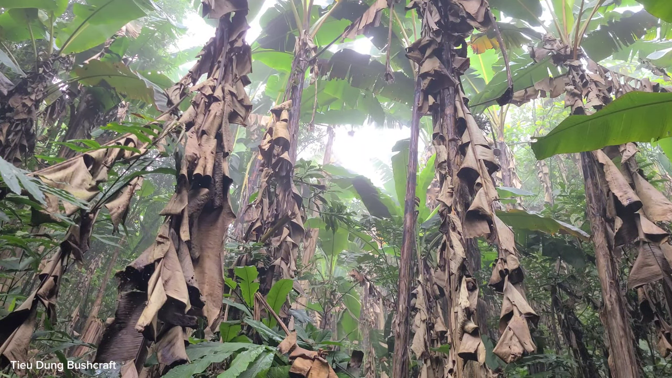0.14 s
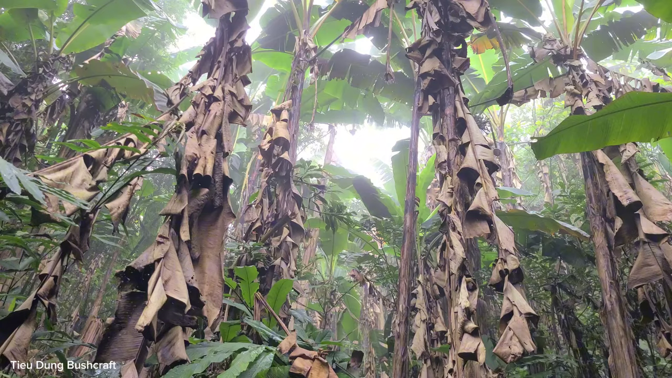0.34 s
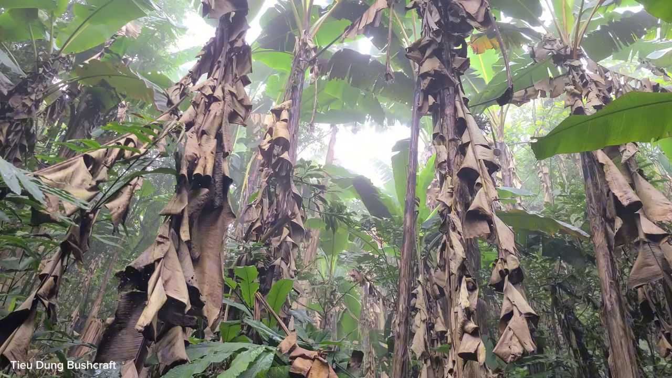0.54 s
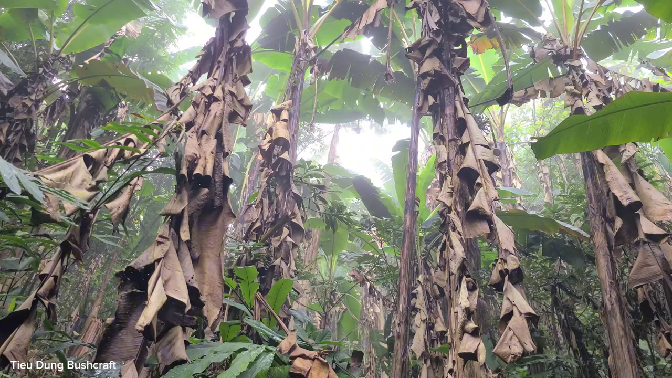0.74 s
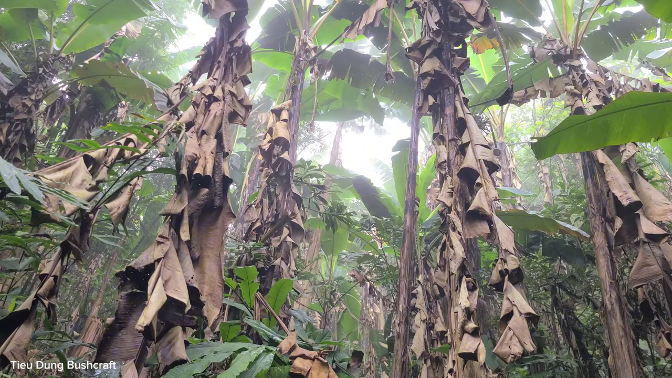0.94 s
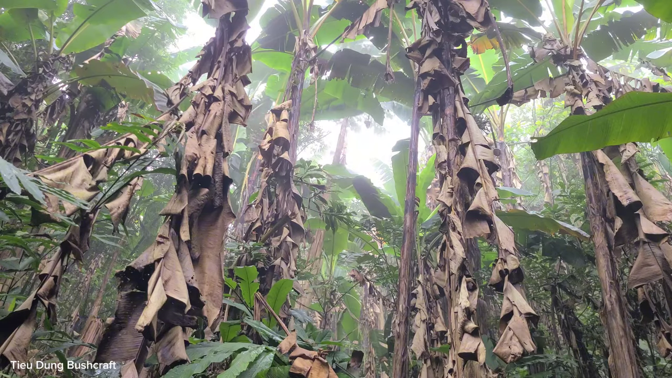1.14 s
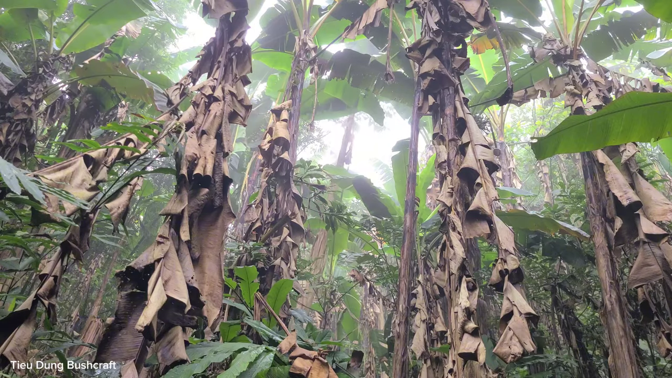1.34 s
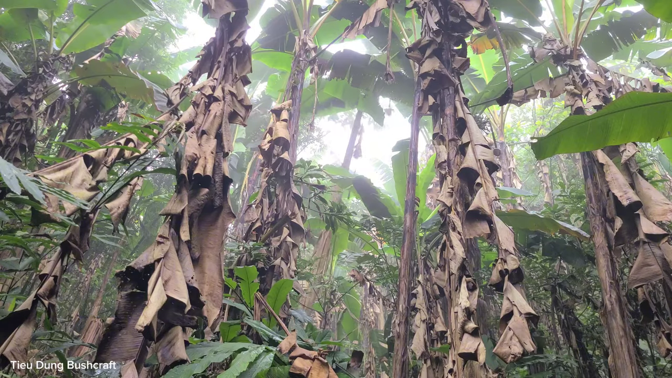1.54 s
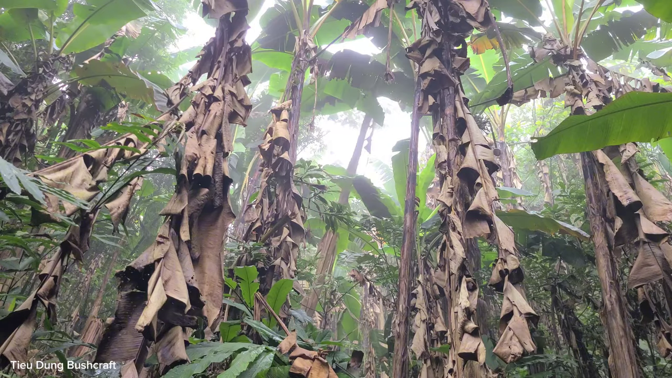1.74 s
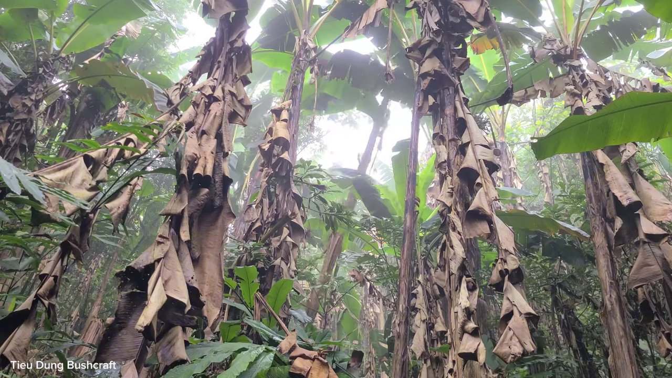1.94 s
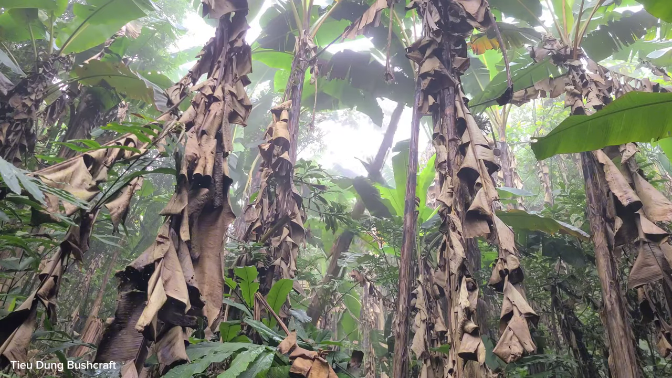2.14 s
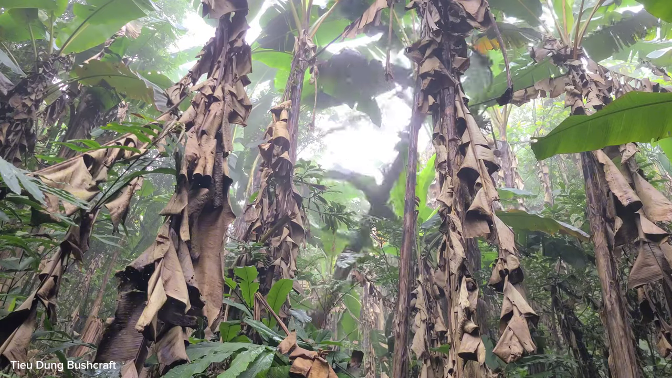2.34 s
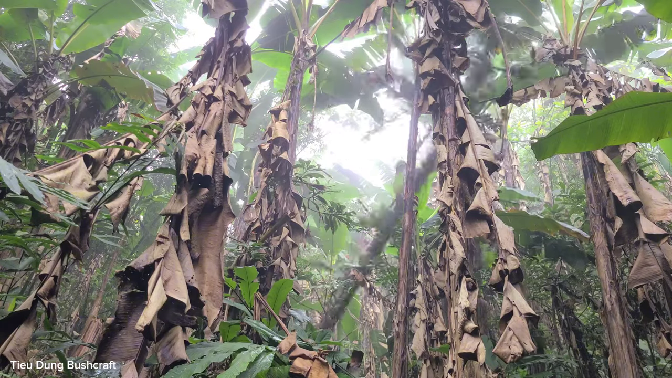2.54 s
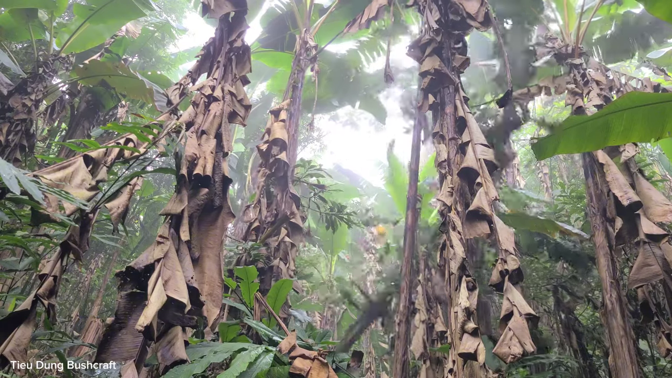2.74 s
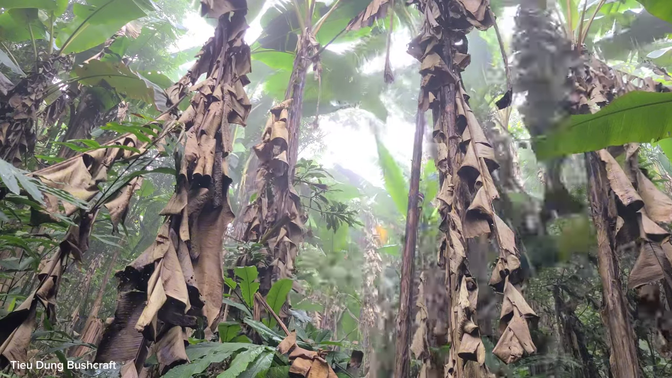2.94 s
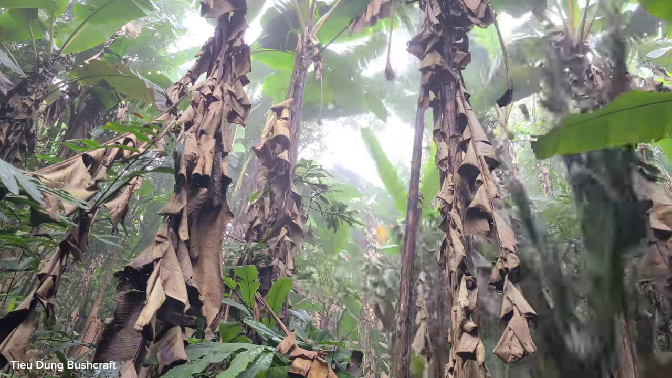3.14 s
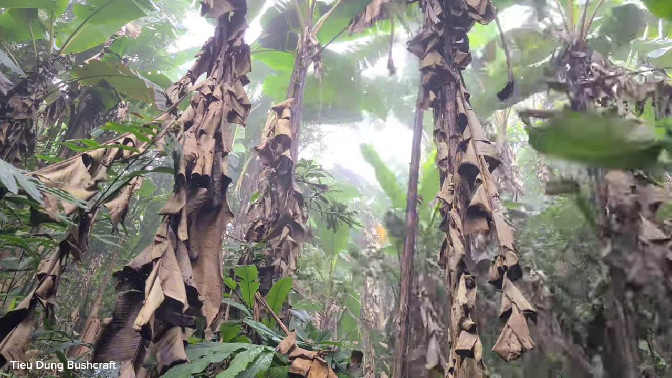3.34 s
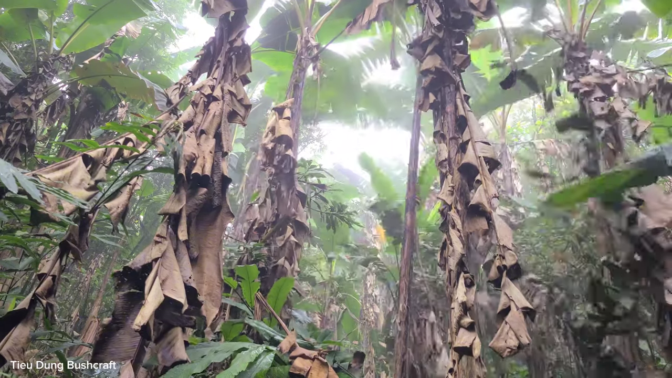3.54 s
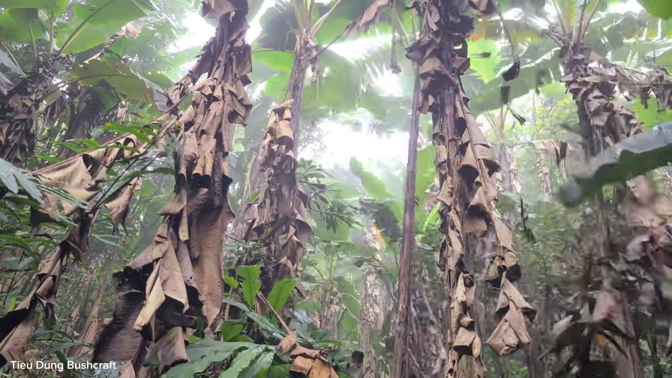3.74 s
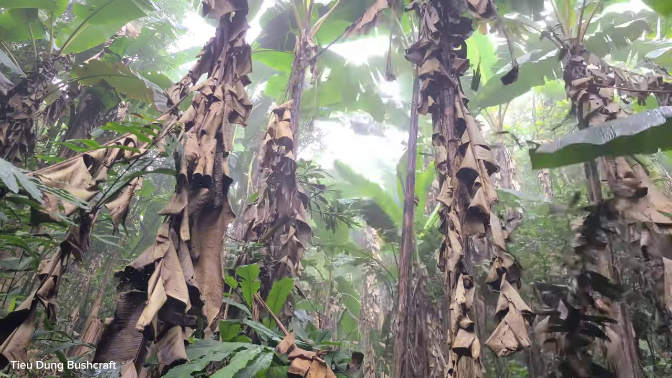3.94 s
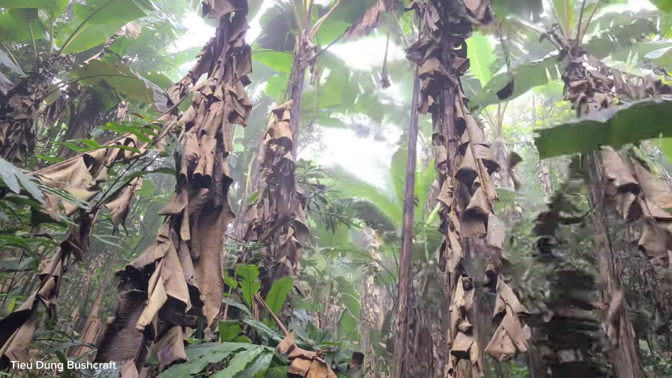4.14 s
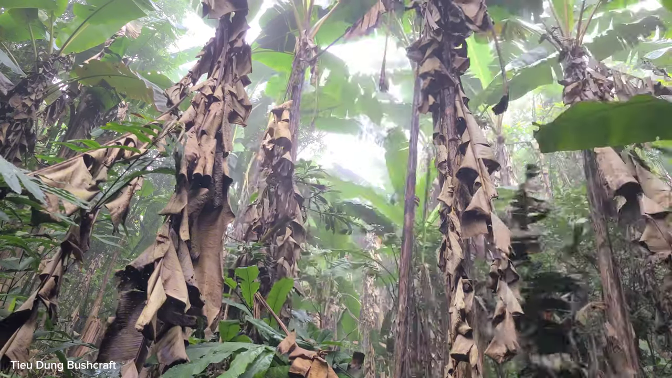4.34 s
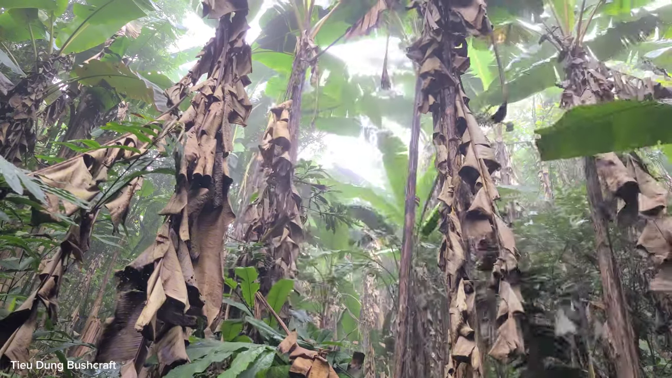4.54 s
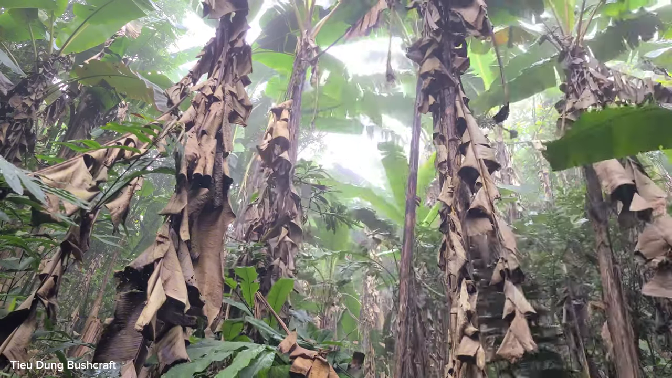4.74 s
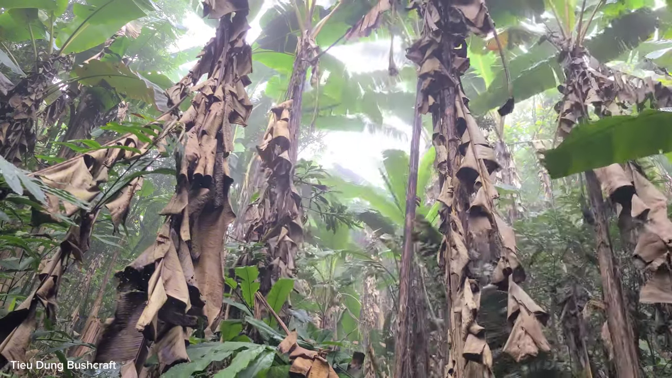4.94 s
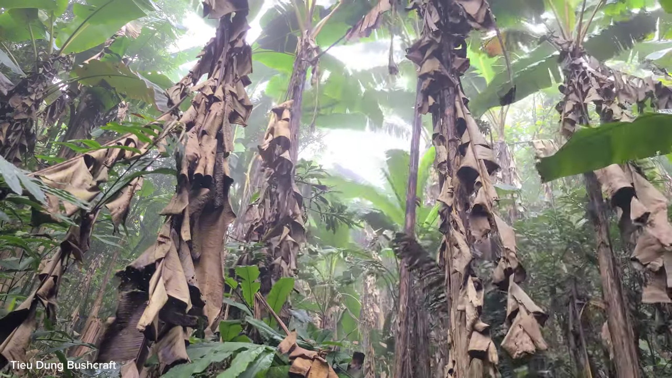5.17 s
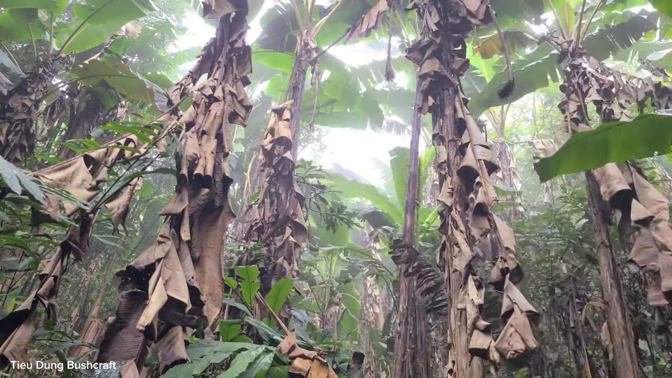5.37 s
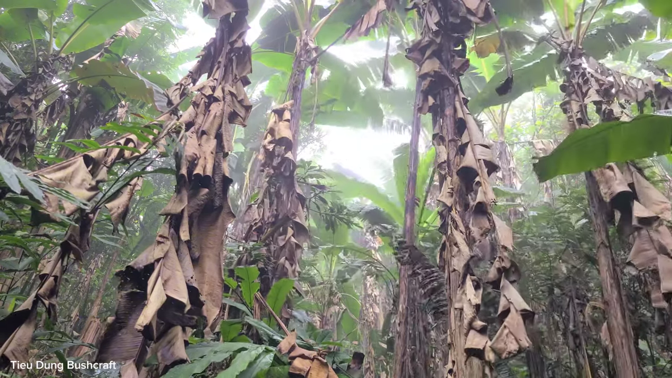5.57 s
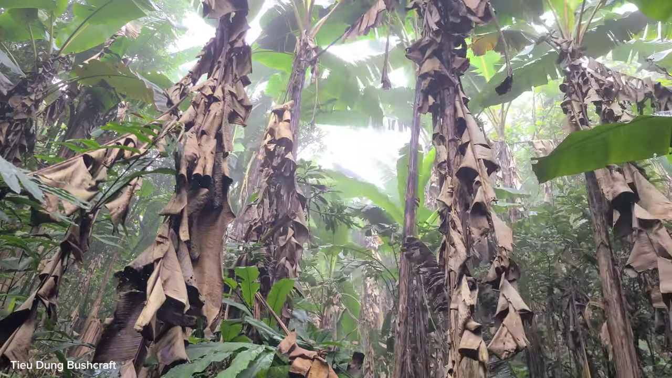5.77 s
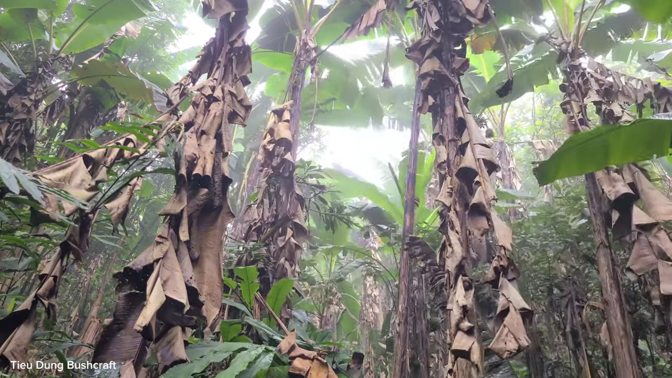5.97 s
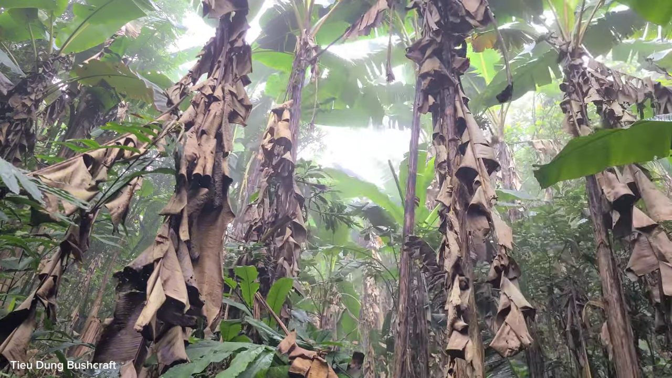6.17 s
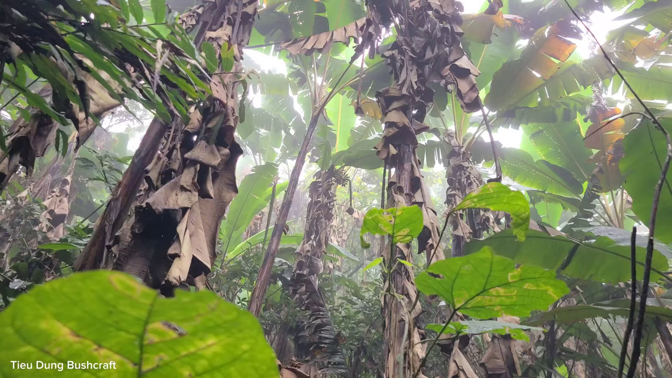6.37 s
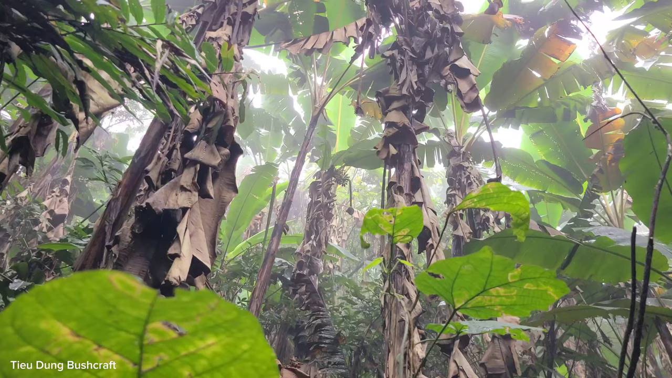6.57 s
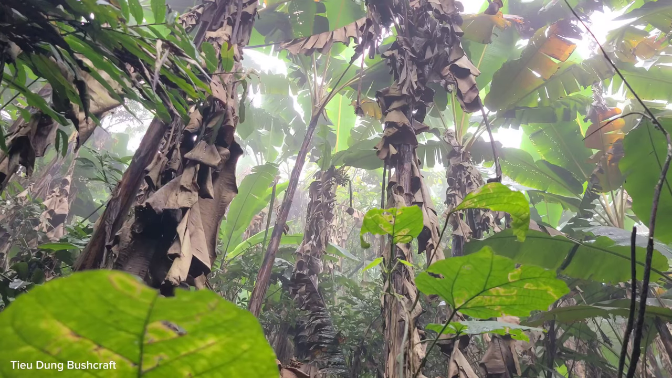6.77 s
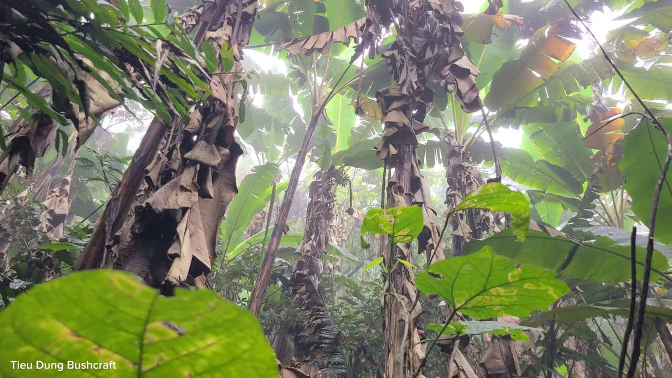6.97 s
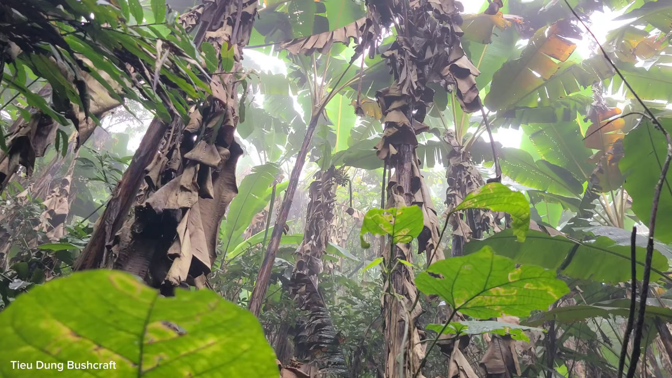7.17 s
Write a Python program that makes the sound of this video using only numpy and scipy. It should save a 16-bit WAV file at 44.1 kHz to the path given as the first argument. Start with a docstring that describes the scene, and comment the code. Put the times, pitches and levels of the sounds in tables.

```python
"""Tree falling through a dry grove

Its trunk groans (slip pulses ring modes), limbs crack (torn bursts ring modes), wood thumps (low sine pulses).
Twigs snap (resonant noise bursts). The crown moves from slightly right to further right.
Leaves (crackle plus noise), boughs (slaps plus noise) and air (low noise) swell with the sweep.
Fine litter sifts afterwards as narrow hiss. Two spaced microphones.
A short diffuse tail answers the cracks, twigs and groan."""
import sys
import numpy as np
from scipy import signal
from scipy.fft import rfft, irfft, next_fast_len
from scipy.io import wavfile
from scipy.ndimage import uniform_filter1d, map_coordinates

SR = 44100
rng = np.random.default_rng(int(sys.argv[2]) if len(sys.argv) > 2 else 0)


def generate_wav(signal):
    """Clip the signal to [-1, 1] and save it as 16-bit WAV at the path in sys.argv[1]."""
    frames = np.transpose(np.atleast_2d(signal))
    scaled = np.clip(frames, -1, 1) * 32767
    pcm = np.round(scaled).astype(np.int16)
    wavfile.write(sys.argv[1], SR, pcm)


N = 317891

# limb cracks: [t/s, level/dB, tear length to 1/e /s]
LIMB_CRACKS = [(0.5774, -19, 0.0072), (.59, -25.5, .02), (.83, -33.5, 0.026), (0.967, -31.5, 0.014),
               (1.055, -31.5, 0.011), (1.465, -39, 0.031), (2.097, -14, 0.034), (2.15, -10.5, 0.0028),
               (2.228, -9.5, 0.073), (2.3429, -5, 0.017), (2.376, -2, 0.01), (2.729, -6.5, 0.011),
               (2.997, -7, 0.011), (3.04, -9, 0.072), (3.185, -6, 0.014), (3.2, -6.5, 0.016),
               (3.245, -5, .025), (3.295, -6, 0.02), (4.507, -26, 0.0093), (4.639, -28, 0.0028),
               (4.77, -30, 0.011), (5.085, -28.5, 0.0039), (5.543, -28, 0.0061), (6.446, -34.5, 0.0072),
               (6.651, -38.5, 0.0026)]
# heavy wood thumps: [t/s, level before THUMP_TRIM_DB /dB, f/Hz]
WOOD_THUMPS = [(.584, -26.5, 94.5), (.593, -23, 177), (.6, -29, 60.4), (1.167, -29.5, 188), (1.24, -39, 62),
               (1.696, -26, 196), (2.245, -18.5, 65), (3.093, -7, 50), (3.176, 2, 198), (3.222, -2, 96),
               (3.25, -14, 55), (3.273, -5, 136), (3.359, -2.5, 171), (6.38, -44, 60), (6.42, -49, 60)]
# twig snaps: [t/s, level before TWIG_TRIM_DB and panning /dB, f/Hz, left lag/ms]
TWIG_SNAPS = [(.1068, -31.5, 1470, 0), (.334, -34.5, 9100, 0.042), (.506, -25.5, 1960, 0.45),
              (.542, -37, 6540, .3), (.741, -30.5, 2230, 0.5), (2.102, -19, 2500, .08),
              (4.329, -23, 3400, .4), (4.535, -19, 3800, .49), (4.538, -16, 9000, 0.47),
              (4.542, -17.5, 5000, 0.41), (4.6391, -22, 2220, 0.42), (4.996, -24.5, 3930, .2),
              (5.082, -31, 4500, 0.37), (5.9885, -34, 6000, 0.32), (6.346, -29.5, 1600, 0.15),
              (6.732, -40.5, 4000, 0.0077), (6.772, -36.5, 1400, 0.083), (7.166, -40.5, 2200, 0.014)]
# resonances of the straining trunk: [f/Hz, width/Hz, relative level/dB]
TRUNK_MODES = [(208, 85, 1), (485, 60, 0), (695, 55, 1.5), (930, 120, -11)]
# resonances of cracking limbs, before sap damping: [f/Hz, width/Hz, relative level/dB]
LIMB_MODES = [(245, 110, -5), (495, 90, 0), (680, 120, -2), (970, 160, -1.5), (1290, 260, -4.5),
              (1700, 400, -10)]
# colour of twig snaps as the microphones hear them: [f/Hz, relative level/dB]
HEARD_SNAP_SPECTRUM = [(40, -45), (150, 4), (600, 12.5), (2000, 5.5), (6800, 2.5), (8200, -7),
                       (12000, -1.5), (16000, -3)]
# colour of leaves as the microphones hear them, before the treble gain: [f/Hz, relative level/dB]
HEARD_LEAF_SPECTRUM = [(80, -70), (500, -9), (1200, 1), (1800, 0.5), (2500, -2.5), (3600, 0.5),
                       (5500, -1.5), (7100, -4), (7900, -13), (10000, -12), (11800, -9), (16000, -15.5)]
# colour of boughs: [f/Hz, relative level/dB]
BOUGH_SPECTRUM = [(50, -61), (120, -41), (220, -1.5), (320, -1.5), (520, 2), (720, -0.5), (1150, -2.5),
                  (1700, -9.5), (2600, -11), (6000, -24)]
# colour of pushed air, before the deep cut: [f/Hz, relative level/dB]
AIR_SPECTRUM = [(15, -35), (35, -12), (65, -5), (110, -6), (180, 1.5), (250, -13), (400, -13), (900, -27.5)]
# crown sweeping the foliage: [t/s, base rustle level/dB]
CROWN_SWEEP = [(0, -55.5), (1, -54), (1.6, -45.5), (1.92, -35.5), (2.08, -34.5), (2.29, -26.5),
               (2.7, -26.5), (3.05, -24.5), (3.28, -20.5), (3.39, -26), (3.52, -36.5), (3.9, -40.5),
               (4.15, -43.5), (4.6, -43), (5.28, -53), (5.9, -55.5), (6.4, -56), (6.65, -59)]
# shaking fronds: [t/s, rustle rise/dB, half length to 1/e /s]
FROND_FLUTTERS = [(0.627, 5, .045), (1.163, 3, 0.064), (2.15, 2.5, 0.032), (2.241, 1.5, 0.029),
                  (2.757, 4, 0.052), (3.734, 5, 0.0064), (3.957, 6, 0.025), (4.772, 4.5, 0.013),
                  (5.36, 6.5, 0.022), (5.566, 1, 0.085), (5.79, 4.5, 0.05), (6.065, 5.5, 0.01),
                  (6.443, 5, 0.052), (6.766, 4, .05), (7.044, 5.5, 0.023)]
# gain of the leaves above 7 kHz: [t/s, level/dB]
LEAF_TREBLE = [(0, -11.5), (1.3, 7.5), (2.3, -1), (2.7, 4.5), (3.9, 4), (5.2, 1), (6.44, 0.5), (6.5, -23),
               (7.2, -13)]
# decay of the grove's tail: [f/Hz, t60/s]
GROVE_DECAY = [(60, 0.25), (200, 0.81), (600, 0.51), (3000, 0.086), (12000, 0.27)]

SPACING_S = 0.00041  # sound's travel time between the microphones
TOP_HZ = 16000
TIP_S, LAND_S, FALL_POWER = 1.54, 3.34, 3.1
UPRIGHT_LAG_MS, FALLEN_LAG_MS = 0.14, 0.26  # left microphone's lag, crown up and down
THUMP_TRIM_DB, TWIG_TRIM_DB = -7.5, 4.5
THUD_DB, THUD_HZ = -4.5, 219  # thud with each crack: dB over crack level, before THUMP_TRIM_DB
TWIG_REACH = 5.8  # treble corner of a snap, in multiples of its pitch
LEAVES_DB = 3.5  # over the sweep
LEAVES_RIGHT_DB, FALLEN_RIGHT_DB = 2.5, 1.5  # right over left; extra once fallen
BOUGHS_DB, BOUGHS_DB_PER_DB = 1.05, 0.94  # trim; gain per dB of sweep
AIR_DB, AIR_DB_PER_DB, AIR_ALOFT_DB = -3, 1.33, -11  # trim; gain per dB of sweep; extra while upright
PIVOT_DB = -40  # sweep level that driven() leaves unchanged


def cracks():
    """Torn fibres stick and slip in a quick run that rings the limb."""
    out, t = np.zeros(N), np.arange(SR // 8) / SR
    # sappy wood swallows the treble
    damp = lambda hz: 1 / (1 + 1j * hz / 1300 - (hz / 1900) ** 2)
    for s, db, length_s in LIMB_CRACKS:
        gaps_s = np.exp(0.25 * rng.standard_normal(size=50)) / 500
        slip_s = np.cumsum(gaps_s)
        slip_samples = ((slip_s - slip_s[0]) * SR).astype(int)
        slips = np.bincount(slip_samples, minlength=len(t))[:len(t)]
        grit = 0.8 * rng.standard_normal(len(t))
        tear = (unit(slips) + grit) * np.exp(-(t / length_s) ** 2)
        sound = filtered(tear, lambda hz: ringing(LIMB_MODES, hz) * damp(hz))
        add(out, s, amp(db) * sound / np.abs(sound).max())
    return from_crown(out)


def thumps():
    """Heavy wood meets soft ground or gives way in a crack: a low push of a few cycles."""
    out, t = np.zeros(N), np.arange(SR // 5) / SR
    thuds = [(s, db + THUD_DB, THUD_HZ) for s, db, _ in LIMB_CRACKS]
    for s, db, hz in list(WOOD_THUMPS) + thuds:
        cycles = t * hz
        envelope = cycles / 0.5 * np.exp(1 - cycles / 0.53)
        push = envelope * np.sin(2 * np.pi * cycles)
        add(out, s, amp(db + THUMP_TRIM_DB) * push)
    return from_crown(out)


def groan():
    """Fibres slip at an uneven rate and ring the trunk: faintly under strain, strongly as it gives way."""
    slips = ticks(400, spread_db=0.0)
    sound = unit(filtered(slips, lambda hz: ringing(TRUNK_MODES, hz)))
    strained_db = swell(peak_db=-59.5, start_s=0.77, end_s=2, rise_db_per_s=5, fall_db_per_s=44)
    yielding_db = swell(peak_db=-38.0, start_s=1.87, end_s=2.63, rise_db_per_s=30, fall_db_per_s=40)
    return from_crown(sound * (amp(strained_db) + amp(yielding_db)))


def twigs():
    """Dry twigs snap: noise bursts with one broad resonance, dulled by the foliage between."""
    out, t = np.zeros((2, N)), np.arange(SR // 20) / SR
    heard = lambda hz: amp(along(HEARD_SNAP_SPECTRUM, hz))
    for s, db, pitch_hz, lag_ms in TWIG_SNAPS:
        dull_hz = TWIG_REACH * pitch_hz
        burst = rng.standard_normal(len(t)) * np.exp(-(t / 0.0028) ** 2)
        scatter = amp(-15) * rng.standard_normal((2, len(t))) * amp(-60 * t / 0.04)
        stick = lambda hz: 0.35 + ringing([(pitch_hz, 0.45 * pitch_hz, 0)], hz)
        foliage = lambda hz: 1 / np.sqrt(1 + (hz / dull_hz) ** 4)
        late = lambda hz: np.exp(-2j * np.pi * hz * np.array([[lag_ms / 1000], [0]]))
        sound = filtered(burst + scatter, lambda hz: stick(hz) * foliage(hz) * heard(hz) * late(hz))
        add(out, s, amp(db + TWIG_TRIM_DB) * sound / np.abs(sound).max())
    return out * amp([[-1.5], [1.5]])


def leaves():
    """Dry blades crackle in clusters; the harder the sweep, the more the crackles merge into hiss."""
    level_db, = curves(CROWN_SWEEP)
    treble_db, = curves(LEAF_TREBLE)
    right_db = LEAVES_RIGHT_DB + FALLEN_RIGHT_DB * fallen()
    rate_hz = 450 * amp(0.7 * (level_db + 48.5))
    t = np.arange(SR // 100) / SR
    crackle = np.zeros((2, N))
    for _ in range(8):  # each clump has its own crinkle and moments
        crinkle = rng.standard_normal((2, len(t))) * amp(-60 * t / 0.0064)
        stirring = ticks(rate_hz / 8, spread_db=2.0) * amp(1.8 * wobble(7))
        crackle += signal.fftconvolve(stirring[None], crinkle, axes=1)[:, :N]
    mix = rush(patchy_db=1.5) + amp(-5.0) * unit(crackle)
    sound = unit(filtered(mix, lambda hz: amp(along(HEARD_LEAF_SPECTRUM, hz))))
    treble = filtered(sound, lambda hz: 1 / (1 + (7000 / (hz + 1)) ** 4))
    sound = sound + (amp(treble_db) - 1) * treble
    tremble_db = 0.6 * wobble(25)
    pan_db = np.array([-right_db, right_db]) / 2
    return sound * amp(level_db + flutter() + LEAVES_DB + tremble_db + pan_db)


def boughs():
    """Branches and broad leaves slap in the crown, over a diffuse swish from all around."""
    level_db = driven(BOUGHS_DB_PER_DB)
    slap_rate_hz = 600 * amp(0.35 * (level_db + 52))
    slaps = from_crown(ticks(slap_rate_hz, spread_db=5.0))
    mix = rush(patchy_db=2.0) + amp(0.5) * slaps
    sound = filtered(mix, lambda hz: amp(along(BOUGH_SPECTRUM, hz)))
    sway_db = 1.2 * wobble(22)
    return unit(sound) * amp(level_db + 0.67 * flutter() + BOUGHS_DB + sway_db)


def air():
    """Air pushed aside by the crown rushes low; a weak rush loses its deepest notes."""
    level_db = driven(AIR_DB_PER_DB) + AIR_DB + AIR_ALOFT_DB * (1 - fallen())
    sound = unit(filtered(rush(patchy_db=2.0), lambda hz: amp(along(AIR_SPECTRUM, hz))))
    deep = filtered(sound, lambda hz: 1 / (1 + (hz / 60) ** 6))
    deep_db = 1.4 * np.minimum(level_db + 47, 0)
    return (sound + (amp(deep_db) - 1) * deep) * amp(level_db)


def sifting():
    """Tiny grains of litter make a narrow hiss that lingers after the fall."""
    hiss = rush(patchy_db=2.5)
    grains = all_around(np.array([ticks(900, spread_db=0), ticks(900, spread_db=8)]))
    sound = unit(filtered(hiss + grains, lambda hz: ringing([(4200, 760, 0)], hz) ** 2))
    litter_db = swell(peak_db=-50.5, start_s=4.3, end_s=5.2, rise_db_per_s=31, fall_db_per_s=16)
    return sound * amp(litter_db + np.array([[-2.5], [2.5]]))


def grove(x):
    """Stems and foliage scatter a short diffuse tail, its decay set by frequency."""
    hz, t, z = signal.stft(rng.standard_normal((2, SR // 2)), SR, nperseg=256)
    decay = amp(-60 * t / along(GROVE_DECAY, hz)[:, None])
    tail = all_around(signal.istft(z * decay, SR, nperseg=256)[1])
    return signal.fftconvolve(x, tail / np.linalg.norm(tail[0]), axes=1)[:, :N]


def rush(patchy_db):
    """Diffuse noise with time-frequency patches of random gain."""
    z = signal.stft(rng.standard_normal((2, N)), nperseg=512)[2]
    field = uniform_filter1d(rng.standard_normal(z.shape[1:]), size=7, axis=0)
    field = uniform_filter1d(field, size=8, axis=1)
    noise = signal.istft(z * amp(patchy_db * unit(field)), nperseg=512)[1][:, :N]
    return unit(all_around(noise))


def ticks(rate_hz, spread_db):
    """Random impulses of uneven size; mean power independent of rate."""
    chance = np.clip(rate_hz / SR, 1e-5, 1)
    size = amp(spread_db * np.minimum(rng.standard_normal(N), 2.5))
    hits = rng.random(N) < chance
    return unit(hits * size * np.sign(rng.standard_normal(N)) / np.sqrt(chance))


def fallen():
    """Fall progress, slow then gathering speed: 0 upright, 1 on the ground."""
    progress = (np.arange(N) / SR - TIP_S) / (LAND_S - TIP_S)
    return np.clip(progress, 0, 1) ** FALL_POWER


def driven(db_per_db):
    """Level in dB that follows the sweep at this slope."""
    return PIVOT_DB + db_per_db * (curves(CROWN_SWEEP)[0] - PIVOT_DB)


def flutter():
    """Decibels by which shaking fronds lift the rustle."""
    t = np.arange(N) / SR
    return sum(db * np.exp(-((t - s) / half_s) ** 2) for s, db, half_s in FROND_FLUTTERS)


def swell(peak_db, start_s, end_s, rise_db_per_s, fall_db_per_s):
    """Level in dB that climbs to its peak, holds and dies away."""
    t = np.arange(N) / SR
    rise_db = rise_db_per_s * np.maximum(start_s - t, 0)
    fall_db = fall_db_per_s * np.maximum(t - end_s, 0)
    return peak_db - rise_db - fall_db


def from_crown(x):
    """Crown sound reaches the left microphone later, more so as the tree falls to the right."""
    lag_ms = UPRIGHT_LAG_MS + (FALLEN_LAG_MS - UPRIGHT_LAG_MS) * fallen()
    half_samples = lag_ms * SR / 1000 / 2
    return np.array([map_coordinates(x, [np.arange(N) + way * half_samples]) for way in (-1, 1)])


def all_around(pair):
    """Two unrelated signals become a diffuse field: alike in the bass, unrelated in the treble."""
    turn = lambda hz: np.arccos(np.sinc(2 * hz * SPACING_S)) / 2
    mid, side = filtered(pair, lambda hz: np.array([np.cos(turn(hz)), np.sin(turn(hz))]))
    return np.array([mid + side, mid - side])


def ringing(modes, hz):
    """Causal response of (Hz, width Hz, dB) resonances."""
    return sum(amp(db) * 1j * hz * w / (c * c - hz * hz + 1j * hz * w) for c, w, db in modes)


def filtered(x, response):
    """x times a complex response of frequency."""
    n = x.shape[-1]
    m = next_fast_len(n + SR // 4)
    return irfft(rfft(x, m) * response(np.fft.rfftfreq(m, 1 / SR)), m)[..., :n]


def wobble(rate_hz):
    """Smooth random curve with this many knots a second."""
    knots = rng.standard_normal(int(N * rate_hz / SR) + 4)
    return map_coordinates(knots, [np.arange(N) * rate_hz / SR])


def curves(rows):
    """One value per sample for each column after the time."""
    s, *cols = np.transpose(rows)
    return [np.interp(np.arange(N) / SR, s, c) for c in cols]


def along(points, hz):
    """(Hz, value) points interpolated on a log axis."""
    f, v = np.transpose(points)
    return np.interp(np.log(hz + 1), np.log(f + 1), v)


def add(track, s, sound):
    """Mix a sound into a track at time s."""
    part = track[..., max(round(s * SR), 0):][..., :sound.shape[-1]]
    part += sound[..., :part.shape[-1]]


def amp(db):
    """Decibels to gain."""
    return 10 ** (np.asarray(db) / 20)


def unit(x):
    """x at rms 1."""
    return x / np.sqrt(np.mean(x ** 2) + 1e-20)


def scene():
    """Cracks, twigs and groan with their grove tail, plus thumps, inside the rustle."""
    wood = cracks() + twigs() + groan()
    echo = amp(-5.5) * grove(wood)
    rustle = leaves() + boughs() + air() + sifting()
    return wood + echo + thumps() + rustle


def record(dry):
    """Microphones lose the lowest bass; the recorder keeps nothing above its band limit."""
    bass_cut = signal.butter(2, 26, "highpass", fs=SR, output="sos")
    return filtered(signal.sosfilt(bass_cut, dry), lambda hz: hz < TOP_HZ)


dry = scene()
out = record(dry)
generate_wav(out)
```